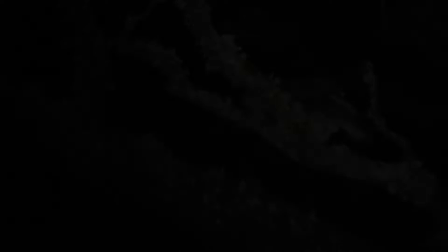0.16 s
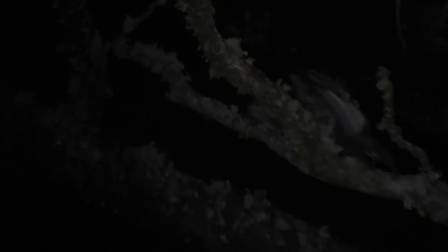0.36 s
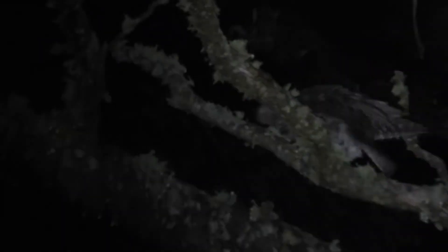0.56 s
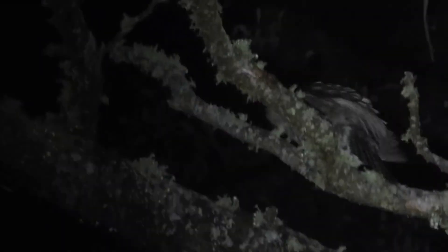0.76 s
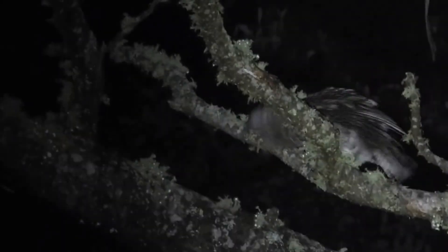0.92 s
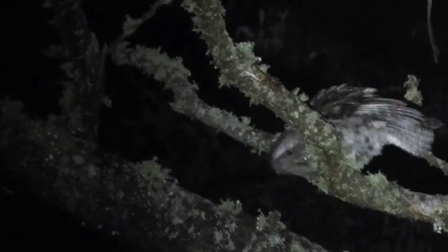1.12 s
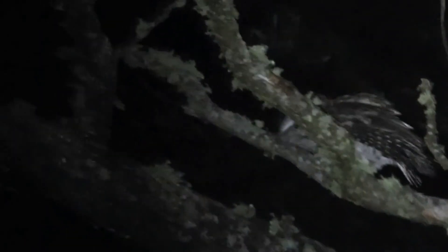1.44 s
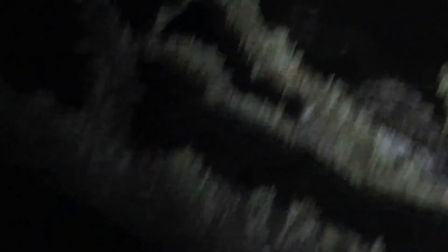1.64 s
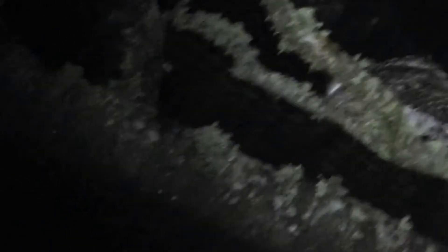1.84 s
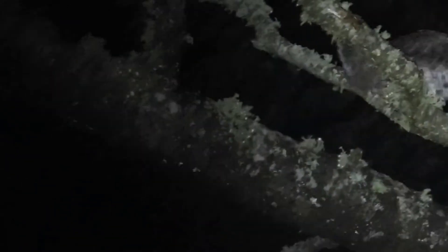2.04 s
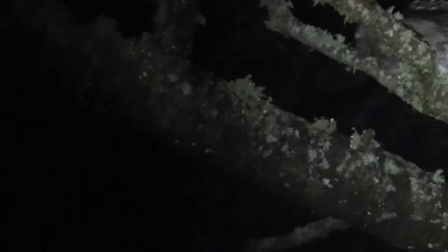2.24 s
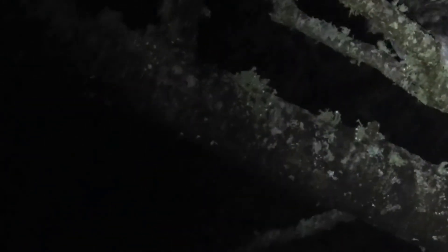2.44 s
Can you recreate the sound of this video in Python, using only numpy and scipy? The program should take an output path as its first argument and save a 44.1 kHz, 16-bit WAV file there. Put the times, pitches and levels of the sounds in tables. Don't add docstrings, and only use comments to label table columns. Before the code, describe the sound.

Tree frogs trill densely and loudly in night woods, deeper frogs knocking beneath; midway a bird gives one short, low wavering call. Light handling clicks dot the stereo microphone, ending with a sharp snap.

```python
import sys
import numpy as np
from scipy import signal
from scipy.io import wavfile
from scipy.ndimage import uniform_filter1d

SR = 44100
rng = np.random.default_rng(int(sys.argv[2]) if len(sys.argv) > 2 else 0)


def master(y):
    cut = np.clip(np.atleast_2d(y).T, -1, 1)
    pcm = np.round(cut * 32767)
    wavfile.write(sys.argv[1], SR, pcm.astype(np.int16))


def nominal_scale(level):
    x = np.asarray(level, float) / 20
    return 10 ** x


N = 113337


def evened(x):
    return x / np.sqrt(np.mean(x ** 2) + 1e-20)


def drift(rate_hz, size=N):
    t = np.arange(size) / SR
    total = 0
    for f in rate_hz * np.geomspace(0.2, 1, 8):
        total = total + np.sin(2 * np.pi * (f * t + rng.random())) / np.sqrt(f)
    return evened(total)


def pan(x, db):
    return x * nominal_scale(np.array([[db / 2], [-db / 2]]))


def resonate(x, hz, width):
    turn = np.exp(2j * np.pi * np.cumsum(hz * np.ones(len(x))) / SR)
    r = np.exp(-np.pi * width / SR)
    return 2 * (turn * signal.lfilter([1 - r], [1, -r], x / turn)).real


def woods(x):
    t60 = 0.52
    t = np.arange(SR // 2) / SR
    tail = rng.standard_normal((2, len(t))) * nominal_scale(-60 * t / t60) * (t > 0.006)
    return signal.fftconvolve(x, tail / np.linalg.norm(tail[0]), axes=1)[:, :N]


def struck(rows, rise_s, t60, pan_db=0.0, noise=0.0):
    out = np.zeros((2, N + SR))
    t = np.arange(SR // 8) / SR
    shape = (1 - np.exp(-t / rise_s)) ** 2 * nominal_scale(-60 * t / t60)
    shape = shape / shape.max()
    for s, db, hz, *side_db in rows:
        ring = (1 - noise) * np.sin(2 * np.pi * hz * t)
        if noise:
            grit = rng.standard_normal(len(t))
            for _ in range(3):
                grit = resonate(grit, hz, 0.45 * hz)
            ring = ring + noise * evened(grit)
        start = round(s * SR)
        out[:, start:start + len(t)] += pan(nominal_scale(db) * shape * ring, pan_db + sum(side_db))
    return out[:, :N]


def chorus():
    # t/s, level/dB, pitch centre f/Hz
    swell = [(0.116, -23, 2542), (0.298, -21, 2377), (0.522, -22.5, 2542), (.56, -18, 2516),
             (.8, -18.5, 2449), (0.961, -17.5, 2454), (1.1, -18, 2493), (1.298, -18.5, 2450),
             (1.451, -18.5, 2490), (1.601, -15, 2513), (1.688, -17, 2423), (1.75, -19, 2524),
             (1.899, -19, 2455), (2.06, -16, 2484), (2.149, -22, 2590), (2.251, -21, 2468),
             (2.35, -23, 2303), (2.57, -22, 2483)]
    frogs, spread_hz, sac_width_hz = 9, 116, 88
    trill_hz, trill_spread, jitter = 80.53, 0.25, 0.3
    call_hz, call_depth_db, pulse_size_db = 6, -1, 2.5
    t, out = np.arange(N) / SR, np.zeros((2, N))
    s, level_db, hz = np.transpose(swell)
    for place in np.linspace(-1, 1, frogs):
        rate = trill_hz * (1 + trill_spread * rng.uniform(-1, 1) + jitter * drift(40.0))
        turns = np.cumsum(rate) / SR
        pulses = np.diff(np.floor(turns), prepend=0) * nominal_scale(pulse_size_db * rng.standard_normal(N))
        calls = pulses * nominal_scale(call_depth_db * drift(call_hz))
        sac_hz = np.interp(t, s, hz) + spread_hz * (1.38 * place + 0.46 * drift(7.2))
        ring = resonate(calls, sac_hz, sac_width_hz)
        ring = resonate(ring, sac_hz, 3 * sac_width_hz)
        side = rng.uniform(-0.4, 1)
        left, right = pan(evened(ring) * nominal_scale(-5.0 * place ** 2), -1.5)
        out += [left, np.roll(right, round(3 * side))]
    out = evened(out) + nominal_scale(0.5) * woods(evened(out))
    return evened(out) * nominal_scale(np.interp(t, s, level_db) - 2)


def near_frogs():
    # t/s, peak level/dB, f/Hz
    near_pulses = [(0.1172, -18.5, 2480), (0.1948, -11.5, 2498), (0.2665, -15, 2530), (0.2967, -15, 2530),
                   (0.3294, -11.5, 2370), (0.3996, -19.5, 2510), (0.4135, -12.5, 2453), (0.477, -17, 2577),
                   (0.5343, -8.5, 2483), (0.5708, -13.5, 2560), (0.706, -13, 2503), (0.7585, -11, 2490),
                   (0.7909, -14, 2500), (0.8337, -15, 2334), (0.9359, -11, 2517), (0.9613, -7.5, 2358),
                   (0.9781, -9.5, 2513), (1.017, -14, 2515), (1.0542, -13.5, 2726), (1.0891, -11, 2460),
                   (1.1189, -6.5, 2440), (1.146, -7.5, 2520), (1.1872, -11.5, 2470), (1.2074, -12, 2515),
                   (1.2662, -31, 2310), (1.2649, -10, 2388), (1.2962, -15.5, 2365), (1.3065, -11, 2454),
                   (1.3323, -9, 2508), (1.3519, -5.5, 2421), (1.3627, -12.5, 2426), (1.3964, -8, 2410),
                   (1.4293, -6.5, 2485), (1.4731, -11, 2482), (1.5112, -14, 2490), (1.5394, -10, 2487),
                   (1.5847, -6.5, 2440), (1.599, -7.5, 2490), (1.6243, -15, 2476), (1.6643, -7.5, 2334),
                   (1.6921, -6, 2380), (1.7242, -12.5, 2550), (1.7834, -14, 2452), (1.8498, -6.5, 2418),
                   (1.9247, -7.5, 2426), (1.9621, -14, 2340), (1.9874, -15.5, 2460), (2.0478, -3.5, 2510),
                   (2.0857, -9, 2410), (2.154, -20.5, 2423), (2.1772, -13, 2397), (2.226, -5.5, 2423),
                   (2.2413, -9.5, 2393), (2.2728, -14, 2453), (2.3392, -11.5, 2474), (2.3577, -14.5, 2380),
                   (2.3933, -22.5, 2390), (2.4266, -11.5, 2353), (2.4873, -23, 2420), (2.5194, -17.5, 2750)]
    near = nominal_scale(-5.5) * struck(near_pulses, rise_s=0.003, t60=0.045, pan_db=-2.0)
    return near + nominal_scale(-4.0) * woods(near)


def deep_frog():
    # t/s, peak level/dB, f/Hz
    knock_hits = [(0.204, -20, 840), (0.259, -21.5, 835), (0.357, -26.5, 870), (0.391, -31, 802),
                  (0.426, -17.5, 863), (0.455, -22.5, 848), (0.526, -23.5, 866), (0.603, -31.5, 881),
                  (0.637, -22.5, 887), (0.68, -19.5, 860), (0.722, -19, 850), (0.754, -23, 882),
                  (0.789, -18.5, 883), (0.878, -33, 867), (0.963, -25, 857), (1.002, -24, 866),
                  (1.045, -25, 844), (1.075, -21.5, 866), (1.13, -15.5, 834), (1.152, -15.5, 867),
                  (1.375, -28.5, 887), (1.43, -34.5, 850), (1.475, -26, 825), (1.579, -25.5, 834),
                  (1.726, -22.5, 797), (2.105, -21.5, 847), (2.154, -19.5, 838), (2.312, -21.5, 815),
                  (2.388, -21, 866), (2.445, -20.5, 815), (2.479, -31, 817), (2.529, -18.5, 825)]
    knocks = nominal_scale(-6) * struck(knock_hits, rise_s=0.0059, t60=0.09, pan_db=3)
    return knocks + nominal_scale(-18.0) * woods(knocks)


def far_frogs():
    # f/Hz, width/Hz, level/dB, throb rate/Hz
    far_bands = [
        (848, 126, -35.5, 28.),
        (1344, 59, -37, 29),
        (1770, 41, -50.5, 16),
        (2923, 400, -37, 59),
    ]
    out = np.zeros((2, N))
    for hz, width, db, throb_hz in far_bands:
        bands = []
        for _ in range(2):
            throbbing = rng.standard_normal(N) * nominal_scale(2.8 * drift(throb_hz))
            bands.append(evened(resonate(resonate(throbbing, hz, width), hz, width)))
        near, other = bands
        out += nominal_scale(db) * np.array([near, 0.51 * near + 0.49 * other])
    return out


def bird():
    # t/s, f/Hz, level/dB
    lower = [
        (1.115, 460.5, -37),
        (1.137, 461.7, -22),
        (1.156, 436.6, -28.5),
        (1.179, 452.5, -23),
        (1.2, 425.7, -29.5),
        (1.22, 426.3, -26.5),
        (1.318, 417.3, -23),
        (1.332, 400, -30.5),
        (1.4, 385.5, -33.5),
    ]
    # t/s, f/Hz, level/dB
    upper = [
        (1.165, 822, -34.5),
        (1.192, 802.5, -29),
        (1.212, 732.5, -22.5),
        (1.225, 738, -19),
        (1.25, 761.5, -22),
        (1.29, 770, -19.5),
        (1.312, 760, -25.5),
        (1.332, 710, -26),
        (1.345, 723, -40),
    ]
    waver_hz, waver_depth_hz, waver_phase = 22.6, 22.0, -1.2
    roughness, breath_db, overtone_db = 0.11, -2, -6.0
    croak_hz, croak_from_s, croak_depth = 41.0, 1.336, 0.9
    t, out = np.arange(N) / SR, np.zeros(N)
    for voice, strain in ((lower, 0.25), (upper, 1.0)):
        s, hz, db = np.transpose(voice)
        waver = np.sin(2 * np.pi * waver_hz * (t - s[0]) + waver_phase)
        pitch = np.interp(t, s, hz) + strain * waver_depth_hz * waver
        tone = np.sqrt(2) * np.sin(2 * np.pi * np.cumsum(pitch) / SR)
        tone = tone * (1 + strain * roughness * drift(70.0))
        air = rng.standard_normal(N)
        breath = evened(resonate(resonate(air, pitch, 260.0), pitch, 260.0))
        hoarse = evened(resonate(resonate(air, 1.45 * pitch, 260.0), 1.45 * pitch, 260.0))
        edges = np.clip(np.minimum(t - s[0], s[-1] - t) / 0.0094, 0, 1)
        croak = (t > croak_from_s) * np.sin(2 * np.pi * croak_hz * (t - croak_from_s))
        edges = edges * (1 + croak_depth * croak)
        airy = nominal_scale(breath_db) * breath + nominal_scale(overtone_db) * hoarse
        out += edges * nominal_scale(np.interp(t, s, db)) * (tone + strain * airy)
    return pan(out, -2.0) + nominal_scale(-11.0) * woods(out[None])


def casing_clicks():
    # t/s, peak level/dB, f/Hz
    taps = [
        (.1707, -27, 4620),
        (.193, -29, 3730),
        (.2021, -29, 5720),
        (.7041, -29.5, 5330),
        (1.001, -30, 4080),
        (1.3691, -32, 4000),
        (1.3861, -28.5, 4950),
        (1.9108, -30.5, 4440),
        (2.5151, -22, 3800),
        (2.5251, -13, 6000),
    ]
    # t/s, peak level/dB, f/Hz, left-right level/dB
    fine_ticks = [(.2, -37, 9170, -13.5), (.71, -42, 8000, -13), (1.142, -47.5, 10170, -26),
                  (1.222, -52.5, 8600, -20.5), (1.272, -49, 9540, 19), (1.284, -44, 9500, 15.5),
                  (1.39, -41.5, 8120, -3), (1.601, -50.5, 7900, -20), (2.05, -38.5, 7370, -24.5),
                  (2.05, -46.5, 13260, -31.5), (2.059, -50.5, 13000, -21.5), (2.526, -46, 9400, -7.5)]
    noise = 0.68
    clicks = struck(taps, rise_s=0.00058, t60=0.015, pan_db=-4, noise=noise)
    clicks = clicks + struck(fine_ticks, rise_s=0.00026, t60=0.0021, noise=noise)
    thin = signal.butter(2, 1500.0, "high", fs=SR, output="sos")
    clicks = signal.sosfilt(thin, clicks) * nominal_scale(0.5)
    return clicks + nominal_scale(-11.0) * woods(clicks)


def rustles():
    # t/s, peak level/dB, f/Hz, left-right level/dB
    brushes = [
        (.15, -58.5, 9500, -14),
        (.185, -50.5, 8300, -14.5),
        (.215, -52.5, 9350, -8),
        (.39, -55.5, 8600, -7.5),
        (.69, -52, 8200, -6),
        (1.375, -47.5, 7340, -9),
        (2.53, -44, 5550, -3.5),
    ]
    return struck(brushes, rise_s=0.0053, t60=0.16, noise=0.62)


def read(points, hz):
    f, value = np.transpose(points)
    return np.interp(np.log(hz + 1), np.log(f + 1), value)


def wash():
    # f/Hz, density level/dB
    wash_low = [(25, -45), (60, -43.5), (95, -24.5), (125, -46), (155, -16.5), (270, -18.5), (450, -10),
                (1000, -9.5), (2000, -4)]
    wash_high = [(2000, 0.62), (2900, 2.5), (3300, -10), (4200, -14), (6000, -18.5), (7150, -25),
                 (7800, -38), (14000, -64.5)]
    # f/Hz, correlation [-1..1]
    likeness = [(60, 0.74), (120, 0.23), (240, 0.67), (480, 0.77), (960, 0.5), (1920, 0.67), (3830, 0.19)]
    # f/Hz, left-right level/dB
    balance = [(60, -4.2), (140, 0.5), (320, -1), (730, -1.5), (1670, -2), (3830, -2)]
    frames, hz = N // 512 + 5, np.fft.rfftfreq(2048, 1 / SR)
    a, b, c, d, patches = rng.standard_normal((frames, 1025, 5)).T
    patches = uniform_filter1d(patches, size=24, axis=0)
    patches = evened(uniform_filter1d(patches, size=5, axis=1))
    same = np.clip(read(likeness, hz), -1, 1)[:, None]
    left = a + 1j * b
    right = same * left + np.sqrt(1 - same ** 2) * (c + 1j * d)
    join = read(wash_low, 2000) - read(wash_high, 2000)
    colour = np.where(hz < 2000, read(wash_low, hz), read(wash_high, hz) + join)
    lean = read(balance, hz) * np.array([[0.5], [-0.5]])
    swell_db = 0.45 * drift(4.6, size=frames * 512)[::512]
    z = np.array([left, right]) * nominal_scale((colour + lean)[..., None] + 1.65 * patches + swell_db)
    air = signal.istft(z, nperseg=2048, noverlap=1536)[1][:, :N]
    return nominal_scale(-25) * evened(air)


def scene():
    called = chorus() + near_frogs() + deep_frog() + far_frogs() + bird()
    low_cut = signal.butter(N=4, Wn=140, btype="high", fs=SR, output="sos")
    called = signal.sosfilt(low_cut, called)
    return called + casing_clicks() + rustles() + wash()


def top_cut(x):
    return signal.sosfilt(signal.butter(12, 13650, fs=SR, output="sos"), x)


def record(dry):
    start_s, rise_s = 0.1148, 0.0012
    opened = np.clip((np.arange(N) / SR - start_s) / rise_s, 0, 1)
    return top_cut(dry * np.sin(np.pi / 2 * opened) ** 2)


dry = scene()
out = record(dry)
master(out)
```